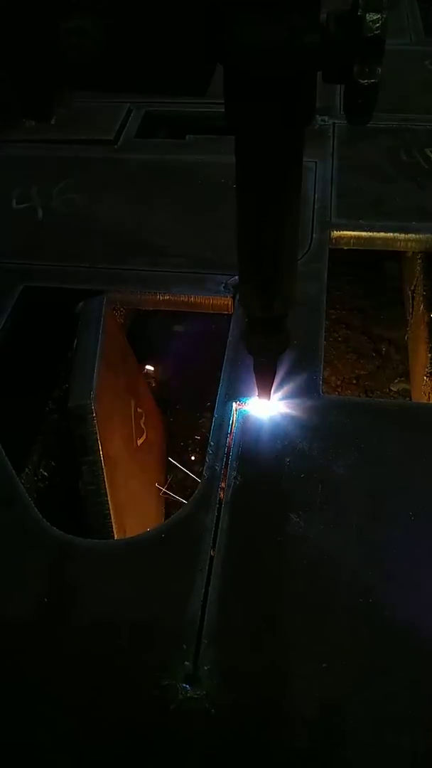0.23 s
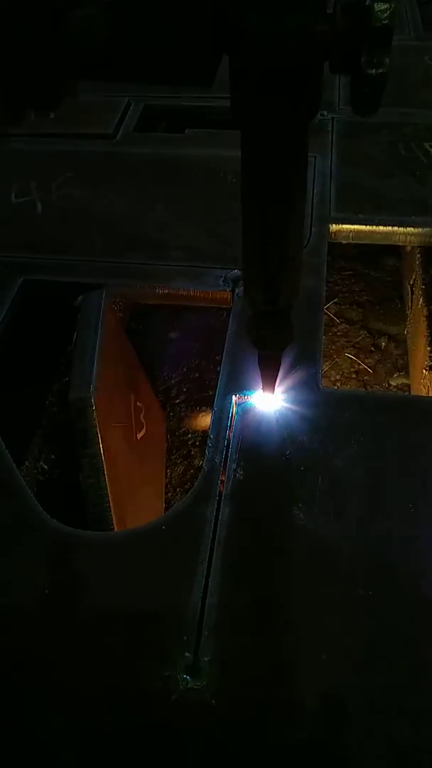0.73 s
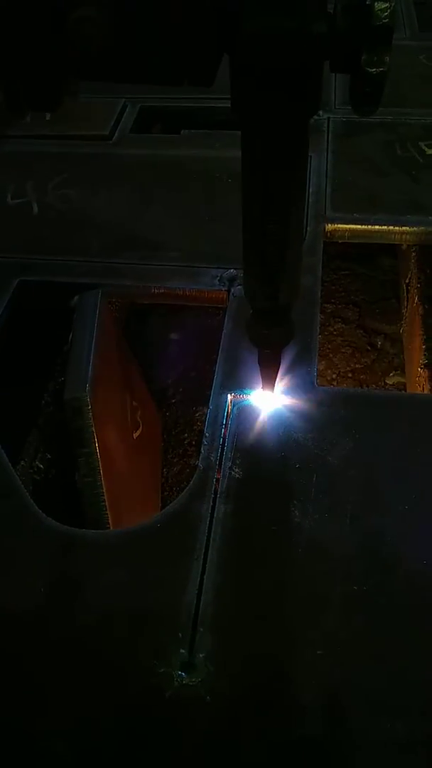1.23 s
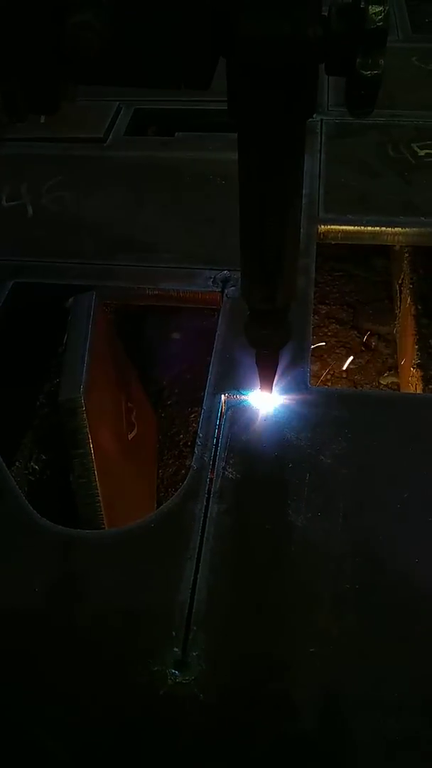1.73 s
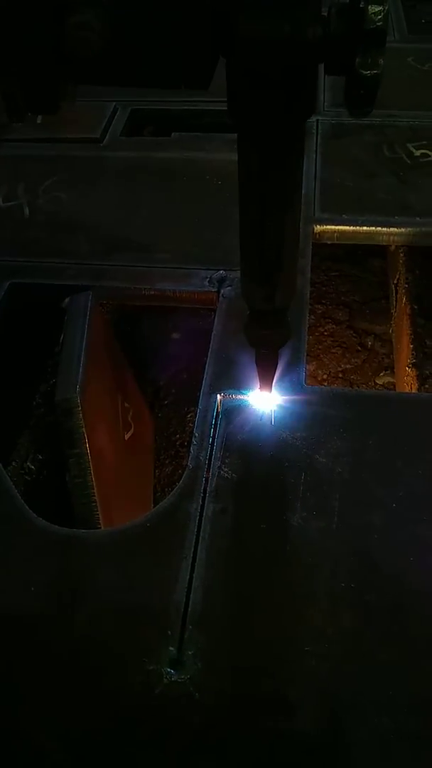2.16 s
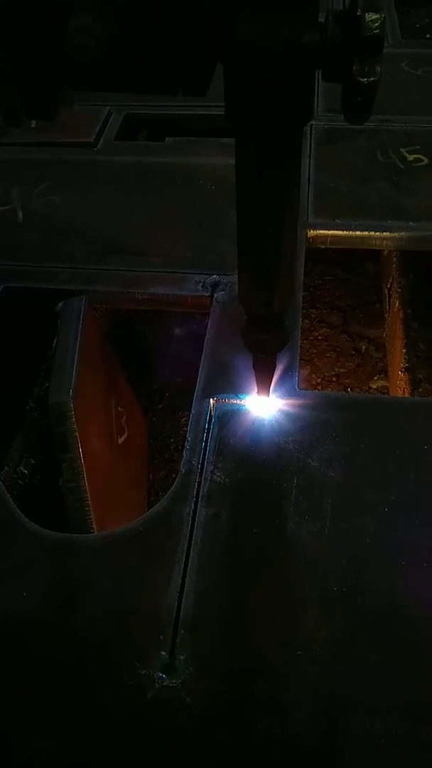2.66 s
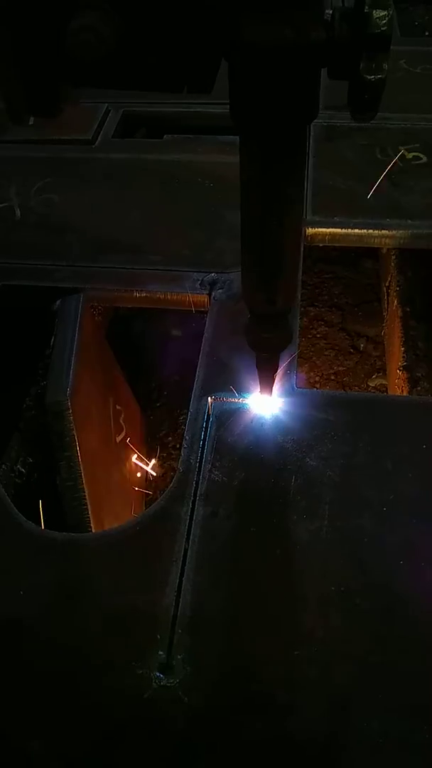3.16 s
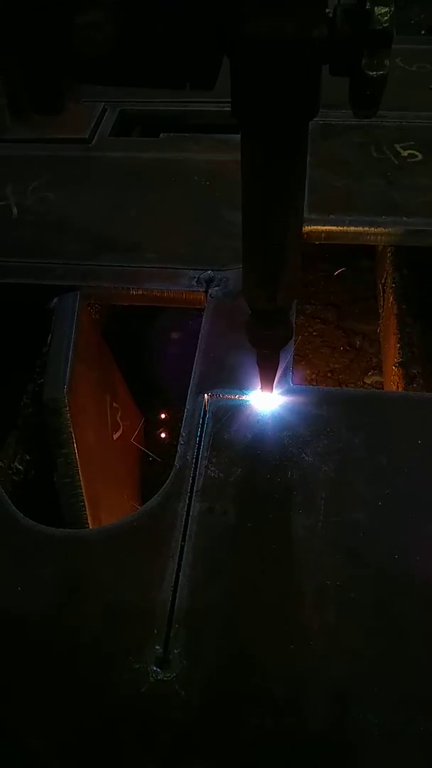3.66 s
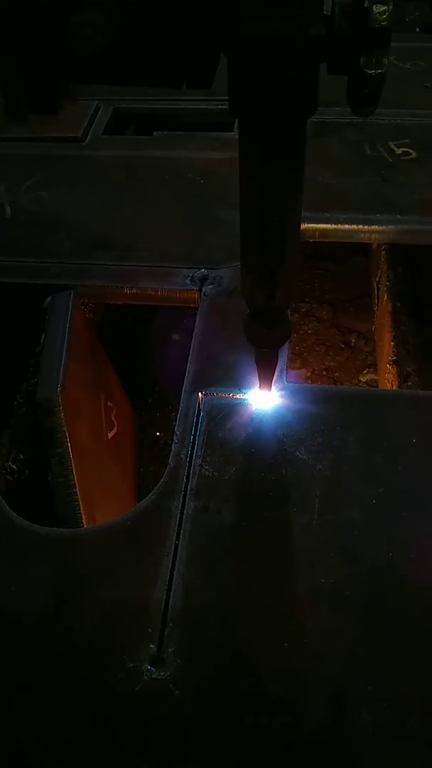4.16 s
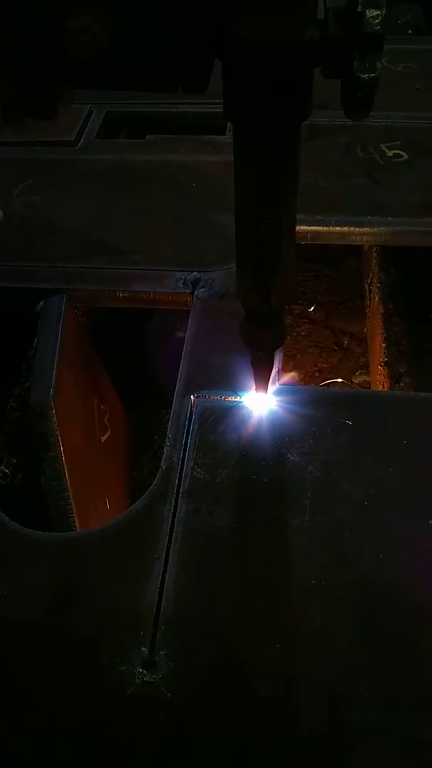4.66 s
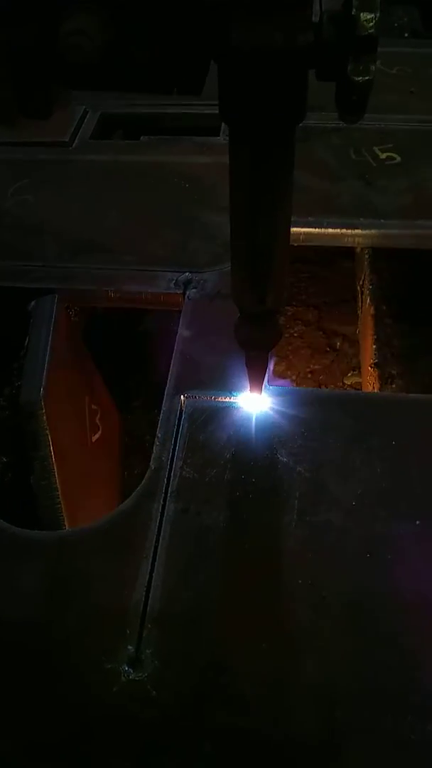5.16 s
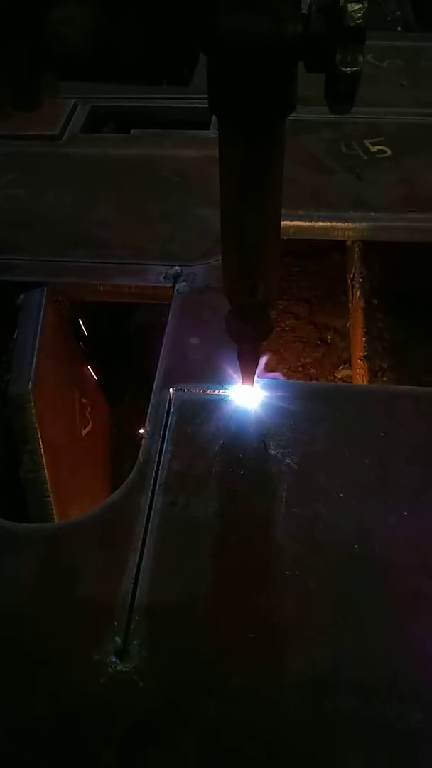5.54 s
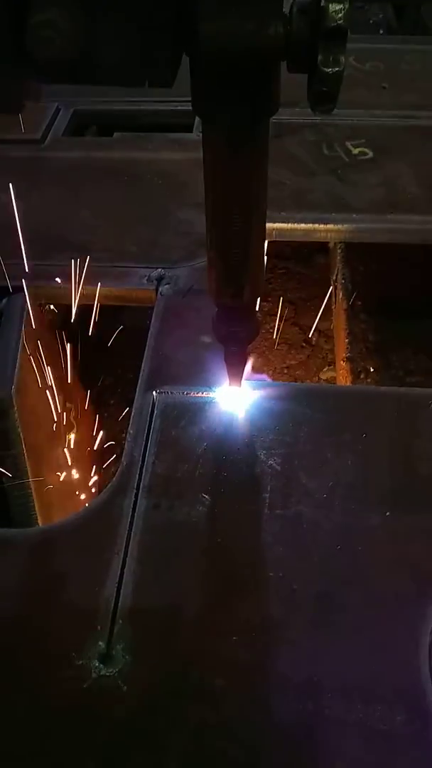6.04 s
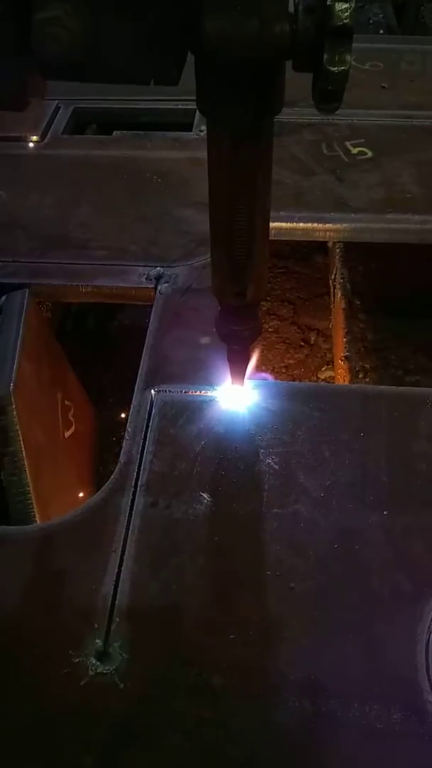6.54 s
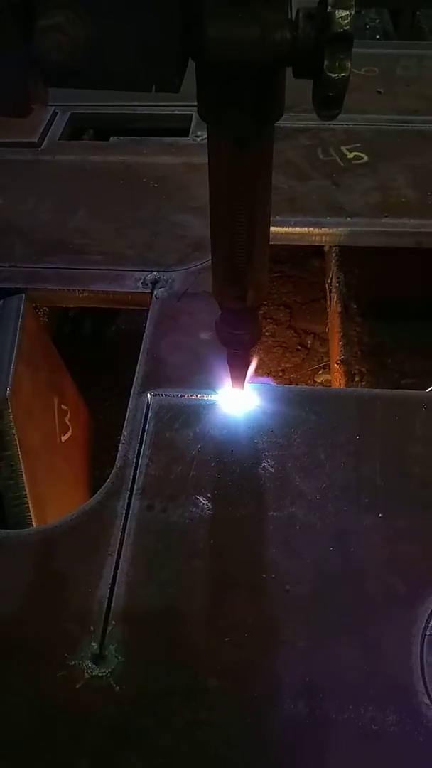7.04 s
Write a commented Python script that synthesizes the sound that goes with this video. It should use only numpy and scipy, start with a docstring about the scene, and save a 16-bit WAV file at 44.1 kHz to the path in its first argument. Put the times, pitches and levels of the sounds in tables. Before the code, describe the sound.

In a workshop, a cutting torch burns through steel plate close to a stereo microphone. A harsh, bright hiss runs throughout, swelling slightly and breaking into thin, watery strands. Beneath it lie a quiet low flame roar and a faint machine hum. Dull low pops cluster between one and two seconds, and two more come around six and a half seconds.

```python
"""A harsh, treble-heavy hiss over a low roar, with dull pops and a faint hum: an oxy-fuel torch burns
through steel plate in a workshop, close to two microphone ports. Hiss and roar are shaped noise, coloured
by kerf and plate; pops are decaying cosines; a machine's hum is sine partials and narrow noise bands.
The right port is further from the jet and wired in opposite polarity. Weak spots of the hiss are turned
down, so it breaks into thin strands."""
import sys
import numpy as np
from scipy import signal
from scipy.io import wavfile
from scipy.ndimage import uniform_filter1d

SR = 44100
rng = np.random.default_rng(int(sys.argv[2]) if len(sys.argv) > 2 else 0)


def put_to_file(sound):
    """Save the sound as 16-bit audio at rate SR, in the file named by the first command-line argument."""
    columns = np.atleast_2d(sound).T  # one column per channel
    safe = np.clip(columns, -1, 1)
    whole_steps = np.round(safe * 32767)
    wavfile.write(sys.argv[1], SR, whole_steps.astype(np.int16))


N = 321930
HOP = 256  # samples per spectral frame
PORT_LAG_S = 0.0004496  # jet to right port, later than to left


def gain_of(db):
    """Decibels to amplitude."""
    return 10 ** (np.asarray(db) / 20)


def evened(x):
    """Scales to rms 1."""
    return x / np.sqrt(np.mean(abs(x) ** 2) + 1e-20)


def read(points, hz):
    """Interpolates a spectrum on a log-frequency axis."""
    f, value = np.transpose(points)
    return np.interp(np.log(hz + 1), np.log(f + 1), value)


def bump(x, centre, width, height):
    """Bell curve over frequency or time; width is two standard deviations."""
    return height * np.exp(-.5 * ((x - centre) / (width / 2)) ** 2)


def wander(t, slow_hz, fast_hz):
    """Slow random motion of rms 1: 30 sines of random phase, weaker as they get faster."""
    rates_hz = np.geomspace(slow_hz, fast_hz, num=30)
    return evened(sum(np.sin(2 * np.pi * (f * t + rng.random())) / np.sqrt(f) for f in rates_hz))


def smooth_noise(bins, frames, over_bins, over_frames):
    """Random field over frequency and time, of rms 1, averaged over neighbouring bins and frames."""
    field = rng.standard_normal((frames, bins)).T
    field = uniform_filter1d(field, size=over_bins, axis=0)
    return evened(uniform_filter1d(field, size=over_frames, axis=1))


def hum(base_hz=84.6):
    """A machine's steady partials with wavering levels, and fuzzy fan tones from resonated noise."""
    # multiple, left_db, right_db, left_lead_rad, waver_db
    partials = [(1, -66, -68, 3., 3), (2, -45, -49, 1.1, 1), (3, -58, -63, -.5, 3),
                (4, -43.5, -60, -1.5, .9), (5, -58, -55, -2.5, 3), (6, -47.5, -55, .2, 1),
                (8, -61, -65, .6, 1), (9, -61, -66, -.4, 1.5), (12, -59, -59, .2, 3)]
    # passing level changes of one partial: multiple, middle_s, length_s, level_db
    swells = [("2", 0.36, 1.5, -10), ("2", 1.28, 0.42, -20), ("4", 0.66, 0.64, 6), ("4", 3.32, 0.96, 6.1),
              ("4", 5.55, 0.99, 4.9), ("6", 3.3, 1.5, 5.3), ("6", 7.47, 0.64, 5.1), ("8", 2.24, 0.49, 14.3),
              ("8", 3.75, 0.56, 9.9), ("8", 4.53, 0.83, 9.9), ("9", 2.7, 1.3, 11), ("9", 5.26, 0.31, 14),
              ("6", .3, .8, 0.86), ("6", 0.98, 0.44, -5.5), ("6", 4.32, 0.39, -13), ("6", 6.2, 0.46, -2.5)]
    # centre_hz, width_hz, level_db
    fans = [(119.3, 4.4, -57.5), (390.3, 1.7, -51.5), (1330, 9.4, -77)]
    t = np.arange(N) / SR
    coarse_s = t[::512]
    out = np.zeros((2, N))
    for k, left_db, right_db, lead_rad, waver_db in partials:
        drift_db = waver_db * wander(coarse_s, 0.267, 3.4)
        drift_db = drift_db + sum(bump(coarse_s, *swell) for which, *swell in swells if int(which) == k)
        phase = 2 * np.pi * (k * base_hz * t + rng.random())
        left = gain_of(left_db) * np.sin(phase)
        right = gain_of(right_db) * np.sin(phase - lead_rad)
        out += np.sqrt(2) * gain_of(np.interp(t, coarse_s, drift_db)) * np.array([left, right])
    for hz, width_hz, db in fans:
        pole = np.exp(-np.pi * width_hz / SR)
        noise = rng.standard_normal((2, N)) + 1j * rng.standard_normal((2, N))
        slow = signal.lfilter([1], [1, -pole], noise)
        out += gain_of(db) * evened((slow * np.exp(2j * np.pi * hz * t)).real)
    return out


def pops(rise_s=0.001, right_db=-0.5, faint_count=9, faint_t60_s=0.043):
    """Each pop is a pressure push that rings briefly in the gap under the plate."""
    # the loudest pops: start_s, level_db, pitch_hz, t60_s
    loud = [(1.058, -17, 80, 0.023), (1.103, -21, 220, .03), (1.123, -26.5, 300, 0.043),
            (1.217, -25, 130, 0.034), (1.398, -20, 230, 0.035), (1.638, -20, 200, 0.028),
            (1.677, -25, 323, 0.035), (6.427, -23, 180, .03), (6.484, -21, 417, .03)]
    out, t = np.zeros(N), np.arange(SR // 8) / SR
    # faint pops at random moments: -51 to -47 dB, 250 to 378 Hz
    faint = [(a * N / SR, -49 + 4 * (b - .5), 250 + 128 * c, faint_t60_s)
             for a, b, c in rng.random((faint_count, 3))]
    for start_s, db, hz, t60_s in loud + faint:
        part = out[round(start_s * SR):][:len(t)]
        envelope = gain_of(db - 60 * t / t60_s) * (1 - np.exp(-t / rise_s))
        part += (envelope * np.cos(2 * np.pi * hz * t))[:len(part)]
    lag = round(PORT_LAG_S * SR)
    return np.array([out, -gain_of(right_db) * np.roll(out, lag)])


def ports(field_db, hz, plateau=0.25, between=0.005, sway=0.0083, ragged=0.091):
    """Noise of a given level at two ports; phase and likeness step by band, alternately alike and opposite."""
    # how firmly the bands step between alike and opposite: freq_hz, firmness (0-1)
    locking = [(350, 0), (900, .45), (1080, 1), (1200, 1), (1500, .75), (1900, 1), (5850, 1), (6100, .25),
               (15000, .25)]
    # extra locking now and then: centre_hz, width_hz, share_of_time (0-1)
    fitful = [(10, 150, .5), (6550, 500, .5), (13500, 600, .22)]
    # passing widening (+) or narrowing (-) of locked bands:
    # centre_hz, width_hz, middle_s, length_s, amount (times 0.4 is share of a band)
    widens = [(4900, 440, 0.74, 0.15, 0.2), (4620, 1000, 1.35, 0.21, 0.61), (4560, 980, 1.1, 0.049, -0.37),
              (4440, 1050, 2.24, 0.41, 0.27), (4400, 1200, 6.06, 0.29, -0.45), (2660, 180, 6.72, 0.3, 0.24),
              (3300, 2300, 0.24, 0.64, -0.052), (4360, 2100, 3.8, 3.3, -0.019), (5500, 900, 2, 0.091, -.35)]
    # likeness of the ports where unlocked: freq_hz, share_alike (0-1)
    direct = [(30, .97), (80, .86), (150, .6), (400, .5), (900, .8), (5000, .8), (7000, .62), (10000, .55),
              (12500, .72), (15000, .65)]
    # left minus right, before the drift below: freq_hz, lean_db
    lean = [(60, 0), (300, 2), (900, 0), (7000, 0), (7600, -2.5), (8000, -.5), (8650, 2.5), (9200, .5),
            (10000, 2), (10700, 1), (11300, 3), (12700, 2.8), (13200, .5), (15000, .5)]
    jumps_per_s, jump_share = 30, .011  # of the band edges; share of pitch, less under 4500 Hz
    frames = field_db.shape[1]
    a, b, c, d = rng.standard_normal((frames, len(hz), 4)).T
    t = np.arange(frames) * HOP / SR

    lag_s = PORT_LAG_S * (1 + sway * wander(t, 4, 25))  # the band edges waver
    jumped = rng.random(frames) < jumps_per_s * HOP / SR
    held = np.maximum.accumulate(np.arange(frames) * jumped)  # each edge holds until the next jump
    locked = read(locking, hz)[:, None]
    reach = jump_share * locked * np.minimum(hz[:, None] / 4500, 1)
    jump = 1 + reach * rng.standard_normal(frames)[held]
    half_turns = 1 - 2 * hz[:, None] * lag_s * jump  # longer path, opposite polarity

    for centre_hz, width_hz, share in fitful:
        chance = wander(t, 2.5, 25)
        now = np.clip(3 * (chance - np.quantile(chance, 1 - share)), 0, 1)
        band = np.clip(bump(hz, centre_hz, width_hz, 1.6), 0, 1)[:, None]
        locked = locked + (1 - locked) * band * now

    off = half_turns - np.round(half_turns)  # from the nearest alike or opposite phase
    plateau = plateau + sum(bump(hz, f, width_hz, 0.4)[:, None] * bump(t, *spell)
                            for f, width_hz, *spell in widens)
    edges = smooth_noise(len(hz), frames, 14, 1)[:, held]  # uneven band widths
    plateau = np.clip(plateau + ragged * (hz[:, None] / 3500) ** 3.44 * edges, -.15, .49)
    # loose only where the sign flips
    banded = 1 - (1 - between) * np.clip((abs(off) - plateau) / (.5 - plateau), 0, 1)
    alike = np.clip(locked * banded + (1 - locked) * read(direct, hz)[:, None], 0, 1)

    turn = np.exp(1j * np.pi * (half_turns - locked * off))
    left = a + 1j * b
    reverberation = c + 1j * d  # of the workshop: noise unrelated to the left port
    right = alike * turn * left + np.sqrt(1 - alike ** 2) * reverberation
    lean_db = read(lean, hz)[:, None] + (.2 - .05 * t) * (1 - locked)  # drifts 0.05 dB/s
    z = np.array([left * gain_of(lean_db / 2), right * gain_of(-lean_db / 2)]) * gain_of(field_db)
    return signal.istft(z, nperseg=1024, noverlap=768)[1][:, :N]


def hiss_level(hz, t, jet_db, tilt_db, patchy_db=0.87, streaky_db=0.2, flicker_db=0.22):
    """Level of the jet's hiss: kerf, plate and table colour it, eddies patch it, the melt flickers it."""
    # free jet, relative density: freq_hz, level_db
    free_jet = [(300, -30), (1100, -16), (1800, -14.6), (3500, -11.3), (5500, -6.7), (8000, -6.6),
                (10000, -2.2), (12200, 0), (13500, -3.2), (14500, -8)]
    # colour of kerf, plate and table: centre_hz, width_hz, level_db
    plate = [(1370, 200, 1.5), (1950, 250, 4.3), (2250, 150, -3.4), (2550, 300, 4.2), (3000, 350, 4.7),
             (3400, 300, -2), (4380, 250, 2.9), (4600, 150, -1.5), (4850, 300, 3.6), (5400, 250, 2.4),
             (5850, 120, -2), (6050, 350, 2.7), (7000, 500, 2.5), (7650, 350, 3.2), (9250, 250, -1.2),
             (10900, 600, 1), (12200, 500, 1.3), (13100, 250, 1), (14200, 300, 1.8)]
    # singing kerf: centre_hz, width_hz, level_db (part of the sum scaled below)
    whistle = (8720, 480, 3.3)
    # passing fades of the whistle: middle_s, length_s, level_db (times 0.58 below)
    whistle_dips = [(0.4, 0.71, -11), (1.5, 0.7, -11), (3.1, 1.6, -9), (6.5, 0.74, -14)]
    # bands of hiss swell or sink for a while: centre_hz, width_hz, middle_s, length_s, level_db
    shifts = [(3210, 270, 6.42, 1.4, 2.2), (3690, 290, 1.82, 0.61, 3.7), (3830, 280, 5.6, 1.24, -3.1),
              (4230, 400, 2.75, 0.52, -3.0), (4660, 590, 4.04, 1.19, 1.6), (4670, 360, 6.76, 1.25, -3.6),
              (4710, 250, 1.15, 1.45, 2.2), (5400, 540, 5.74, 2.51, 2.6), (5840, 260, 1.54, 1.19, 3.2),
              (6080, 300, 7.4, 1.06, -3.4), (6150, 380, 0.02, 0.86, 4.6), (6400, 820, 2.98, 0.68, -2.4),
              (6930, 390, 0.14, 0.67, 2.2), (7640, 400, 0.0, 0.5, -2.2), (7740, 280, 5.15, 0.84, 2.7),
              (8040, 1400, 1.26, 2.56, -1.0), (8140, 250, 7.01, 1.13, 2.4), (8550, 450, 5.48, 1.04, -2.7),
              (8690, 320, 7.18, 0.5, -3.0), (9570, 350, 2.35, 0.7, 3.0), (9870, 660, 7.21, 1.11, 2.6),
              (10720, 310, 2.88, 0.89, 2.2), (11160, 360, 1.59, 0.93, -2.2),
              (11500, 1120, 6.92, 1.61, -1.9), (11840, 330, 4.72, 0.5, 3.4), (11920, 340, 2.84, 0.74, 3.2),
              (13120, 660, 5.29, 0.8, -2.7), (13220, 1790, 1.18, 1.26, 1.8), (13590, 790, 3.37, 1.68, -1.6)]
    # hiss broken into thin strands: centre_hz, width_hz, spread_db (rms)
    strand_band = (2950, 2340, 1.33)
    bins, frames = len(hz), len(t)
    colour_db = read(free_jet, hz) + sum(bump(hz, *mode) for mode in plate)
    colour_db = colour_db - 10 * np.log10(np.mean(gain_of(colour_db) ** 2))
    treble = np.clip(np.log2((hz + 1) / 3000) / 2, 0, 1)[:, None]  # 0 at 3 kHz, 1 at 12 kHz
    hiss_db = colour_db[:, None] + jet_db + tilt_db * (treble - .8)

    whistle_db = whistle[2] + 14 + sum(bump(t, *dip) for dip in whistle_dips)
    hiss_db = hiss_db + bump(hz, *whistle[:2], 0.58)[:, None] * whistle_db
    hiss_db = hiss_db + sum(bump(hz, f, width_hz, 1)[:, None] * bump(t, *swell)
                            for f, width_hz, *swell in shifts)

    patches = smooth_noise(bins, frames, 14, 5)
    streaks = smooth_noise(bins, frames, 5, 150)  # plate echoes shift slowly as the torch travels
    hiss_db = hiss_db + streaky_db * streaks + patchy_db * patches
    hiss_db = hiss_db + flicker_db * wander(t, 6.1, 76) * (0.16 + treble)
    strands = smooth_noise(bins, frames, 2, 7)
    return hiss_db + bump(hz, *strand_band)[:, None] * (strands - .3)


def roar_level(hz, t, roar_db, lumpy_db=1.56):
    """Level of the flame's roar: a fixed low spectrum whose strength wanders."""
    # relative density: freq_hz, level_db
    roar = [(15, -21), (45, -13), (120, 1.5), (250, -2), (400, 2.5), (700, -4), (1100, -12.5),
            (1800, -26.5)]
    colour_db = read(roar, hz)
    colour_db = colour_db - 10 * np.log10(np.mean(gain_of(colour_db) ** 2))
    return colour_db[:, None] + roar_db + lumpy_db * wander(t, 6, 40)


def torch(surge_db=0.35):
    """The jet's hiss and the flame's roar add in power and reach both ports as one turbulent noise."""
    # start_s, jet_db, tilt_db (toward the treble), roar_db
    course = [(0, -18.5, -4, -39.5), (.5, -18, -3, -39.5), (1, -16.5, 0.5, -37.5), (1.4, -16.5, 0, -38),
              (1.6, -17, -0.5, -38), (2.15, -17, -0.5, -40.5), (2.45, -14.5, 1, -37),
              (2.85, -15.5, -0.5, -37), (3.5, -17.5, -1, -39.5), (3.9, -16.5, 0, -39),
              (4.5, -16.5, -2, -38.5), (5, -17.5, -2, -40.5), (5.8, -17.5, -1, -40.5),
              (6.25, -17, 1.5, -40.5), (6.5, -16, 2, -38.5), (6.9, -17, 0.5, -41), (7.3, -18.5, 1.5, -44)]
    hz = np.fft.rfftfreq(1024, 1 / SR)
    t = np.arange(N // HOP + 5) * HOP / SR
    start_s, *columns = np.transpose(course)
    jet_db, tilt_db, roar_db = (np.interp(t, start_s, column) for column in columns)
    jet_db = jet_db + surge_db * wander(t, 2, 10)  # surges as slag clears
    hiss_db = hiss_level(hz, t, jet_db, tilt_db)
    flame_db = roar_level(hz, t, roar_db)
    unit = np.std(ports(np.zeros((len(hz), 200)), hz))  # level of a flat 0 dB field
    return ports(10 * np.log10(gain_of(hiss_db) ** 2 + gain_of(flame_db) ** 2), hz) / unit


def thin_to_strands(x, depth_db=-30, makeup_db=1.65):
    """Turns down weak spots in the ports' sum and difference, so the hiss breaks into thin strands."""
    # freq_hz, threshold_db (relative to local level)
    thresholds = [(1500, -30), (2000, -5), (2700, -2.5), (4200, -2), (5000, -4), (6800, -4), (8500, -8),
                  (14500, -9)]
    pair = np.array([[1, 0.99], [1, -1]]) / np.sqrt(2)
    hz, _, z = signal.stft(pair @ x, SR, window="cosine", nperseg=2048, noverlap=1536)
    power = abs(z) ** 2
    local = uniform_filter1d(uniform_filter1d(power.sum(0), size=25, axis=0), size=9, axis=1)
    under = gain_of(read(thresholds, hz))[:, None] ** 2
    # makeup follows the threshold's power ratio
    z = z * np.where(power < under * local, gain_of(depth_db), gain_of(makeup_db * under))
    return pair @ signal.istft(z, SR, window="cosine", nperseg=2048, noverlap=1536)[1][:, :N]


def scene():
    """Hum, pops and torch, summed at the two ports."""
    return torch() + pops() + hum()


def record(dry, bass_hz=40., edge_hz=14270):
    """The microphone's bass roll-off, the thinning into strands, then the band limit."""
    rolled_off = signal.sosfilt(signal.butter(1, bass_hz, "high", fs=SR, output="sos"), dry)
    band_limit = signal.firwin(2047, edge_hz, window=("kaiser", 9), fs=SR)
    return signal.oaconvolve(thin_to_strands(rolled_off), band_limit[None], "same")


dry = scene()
out = record(dry)
put_to_file(out)
```